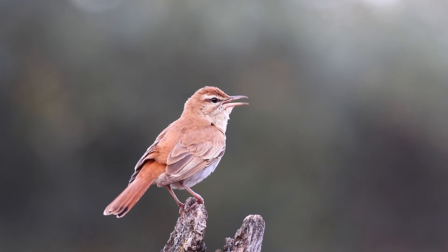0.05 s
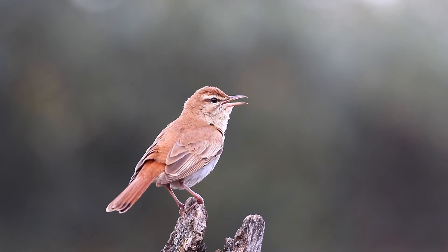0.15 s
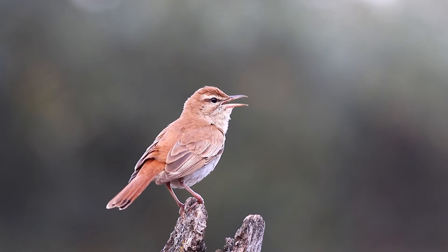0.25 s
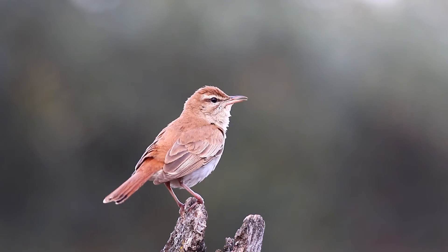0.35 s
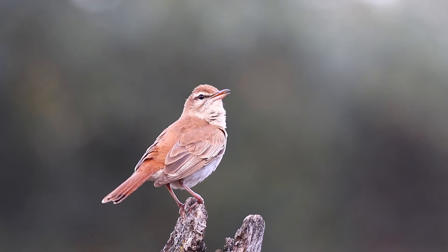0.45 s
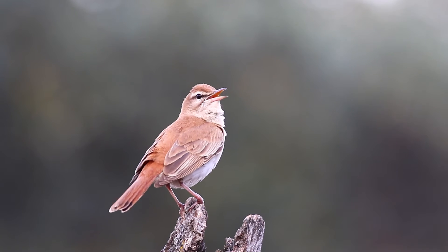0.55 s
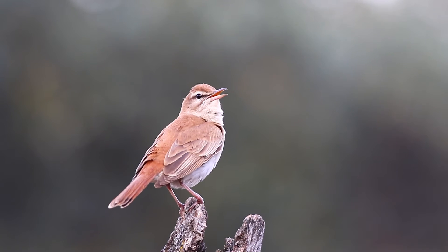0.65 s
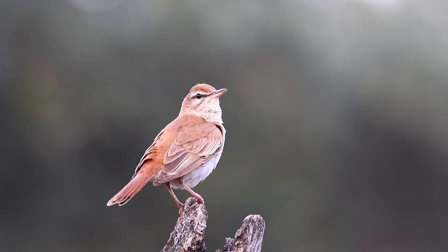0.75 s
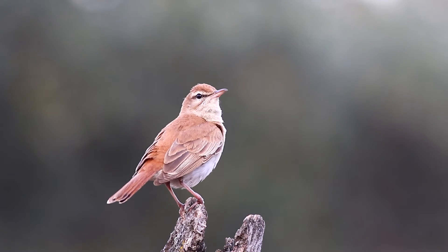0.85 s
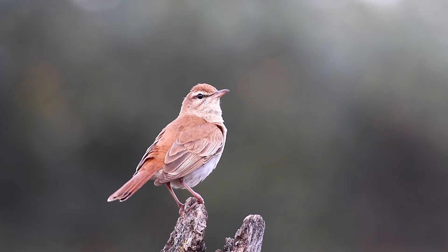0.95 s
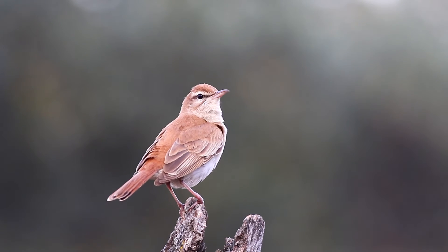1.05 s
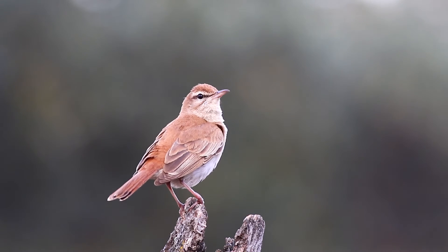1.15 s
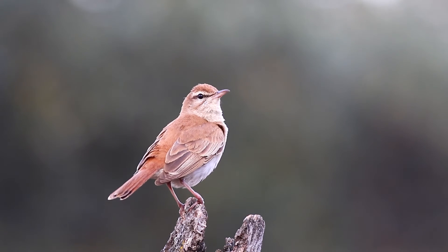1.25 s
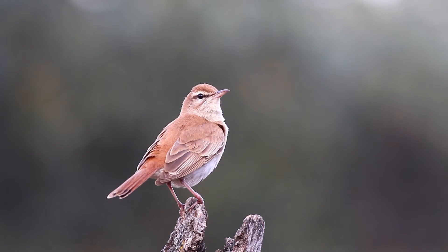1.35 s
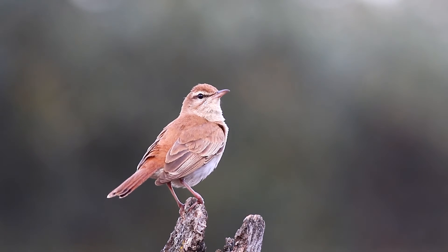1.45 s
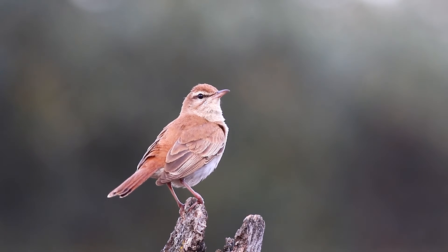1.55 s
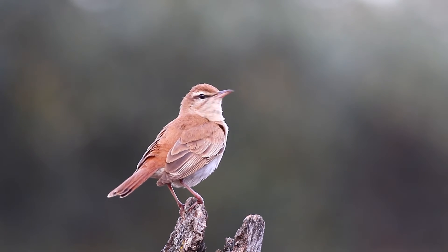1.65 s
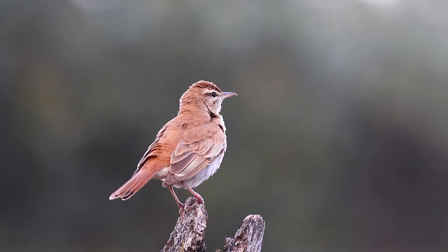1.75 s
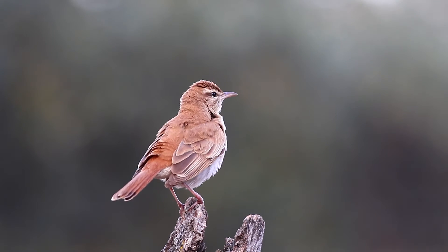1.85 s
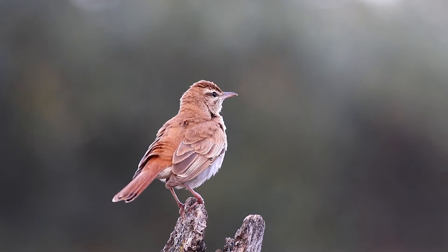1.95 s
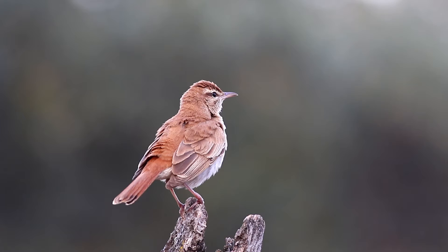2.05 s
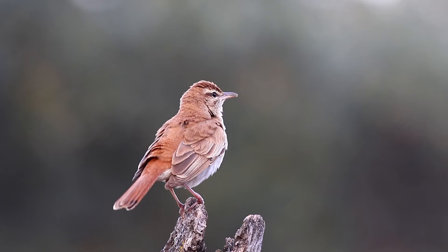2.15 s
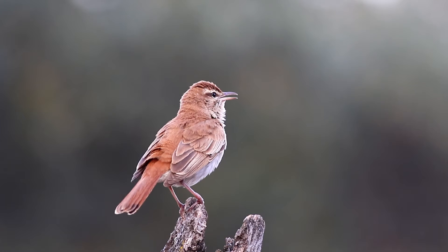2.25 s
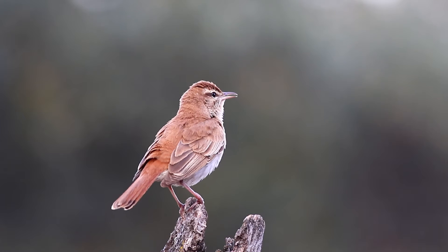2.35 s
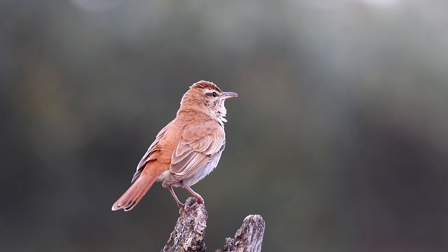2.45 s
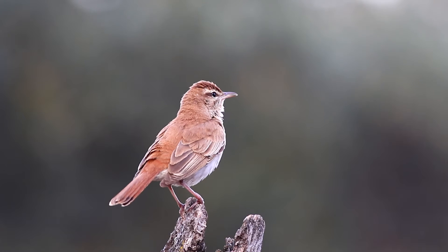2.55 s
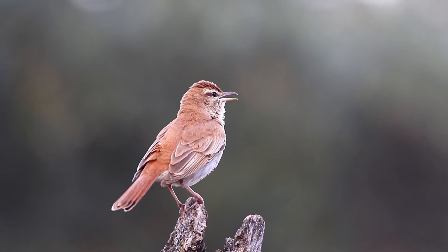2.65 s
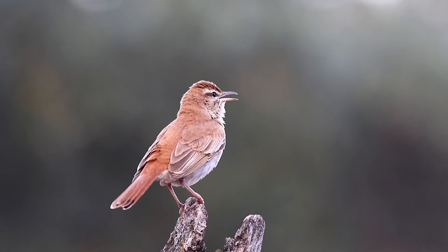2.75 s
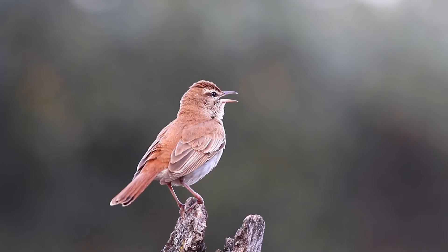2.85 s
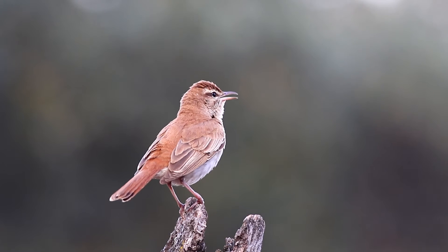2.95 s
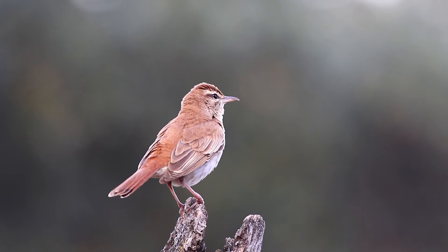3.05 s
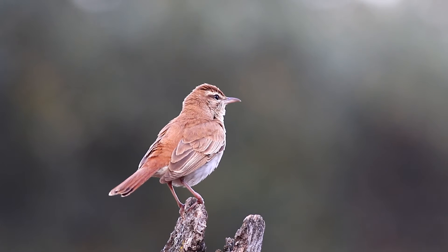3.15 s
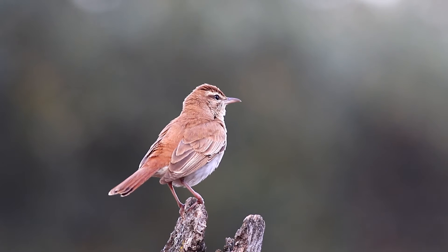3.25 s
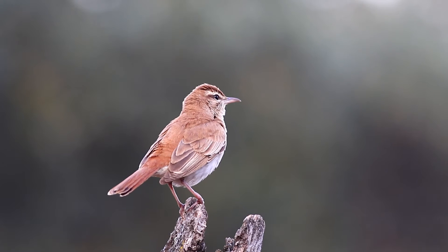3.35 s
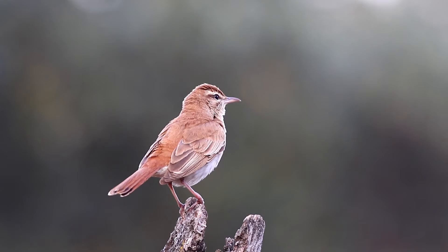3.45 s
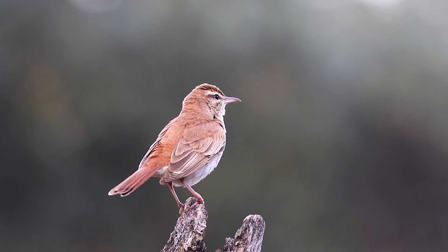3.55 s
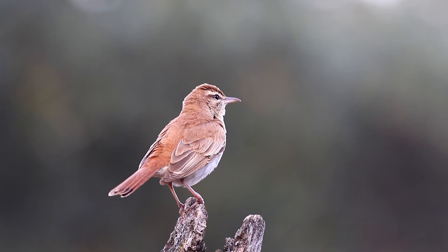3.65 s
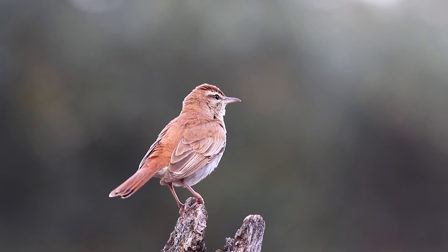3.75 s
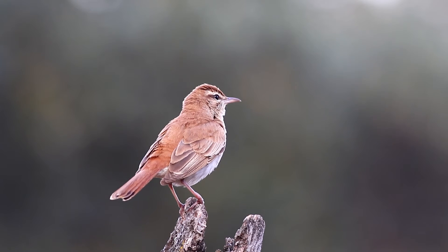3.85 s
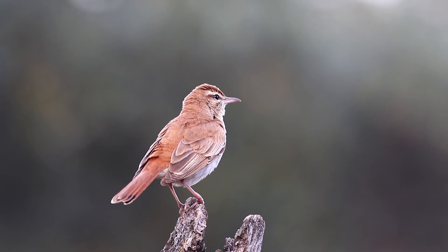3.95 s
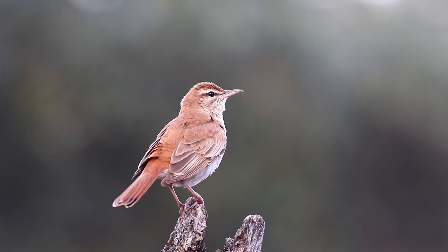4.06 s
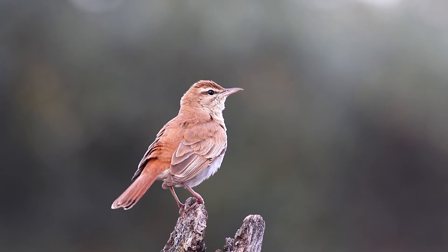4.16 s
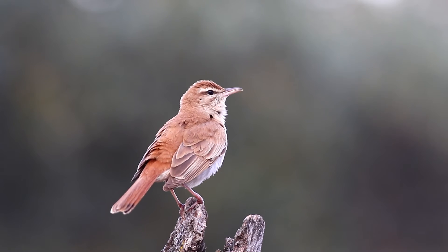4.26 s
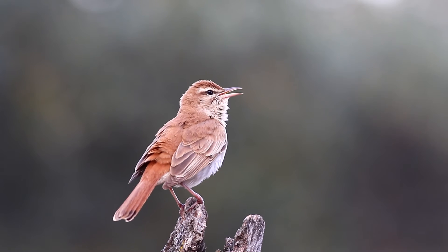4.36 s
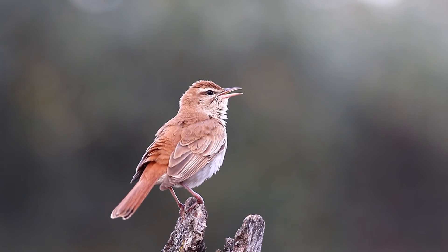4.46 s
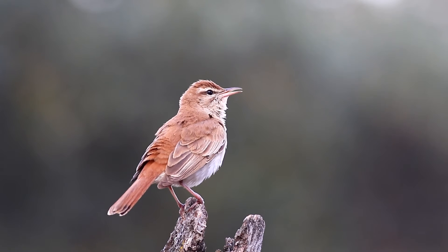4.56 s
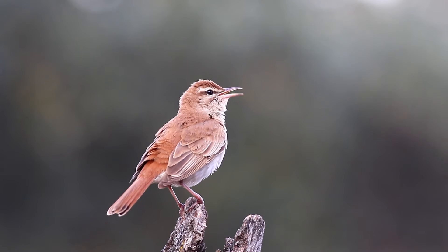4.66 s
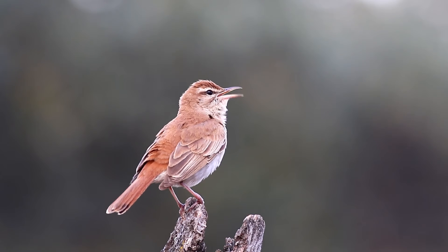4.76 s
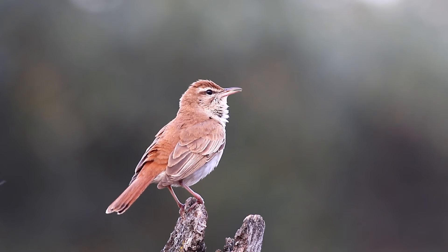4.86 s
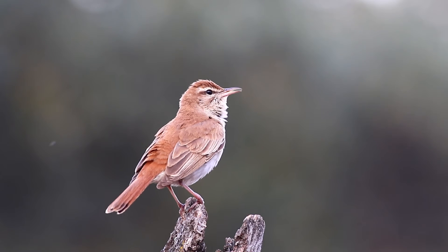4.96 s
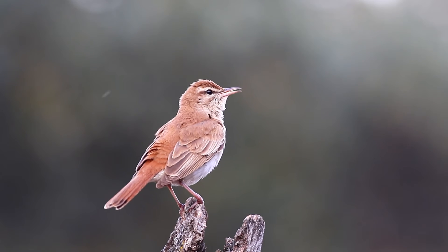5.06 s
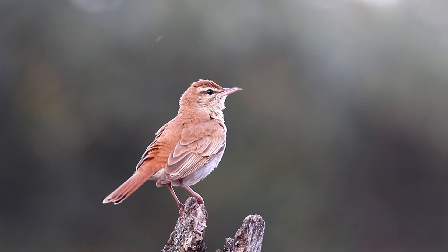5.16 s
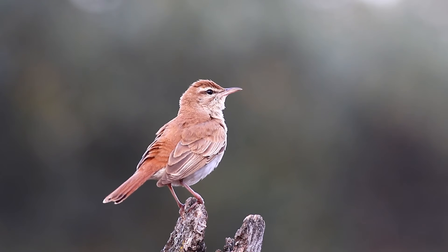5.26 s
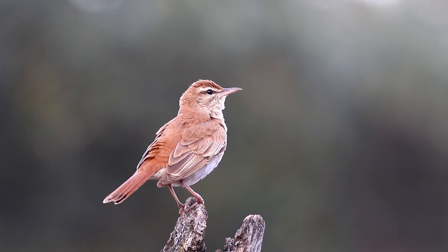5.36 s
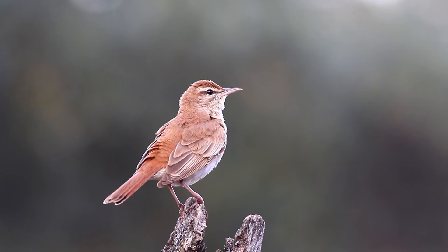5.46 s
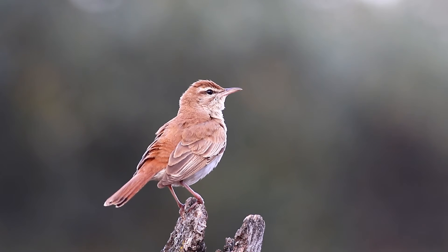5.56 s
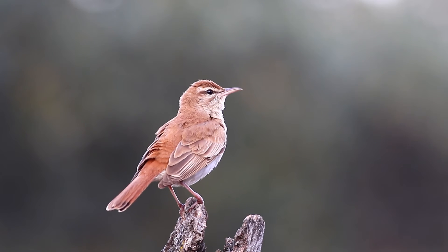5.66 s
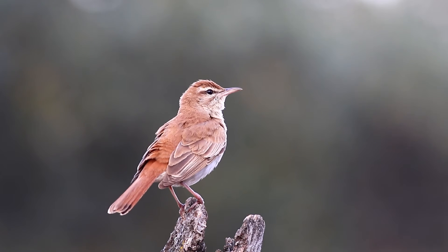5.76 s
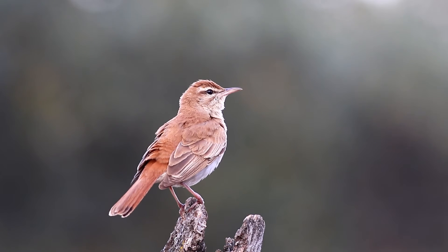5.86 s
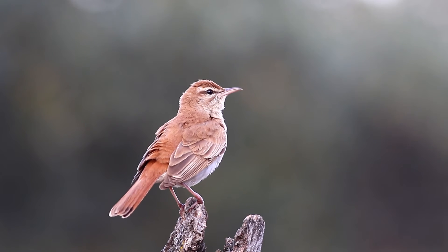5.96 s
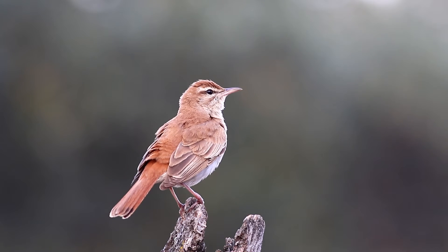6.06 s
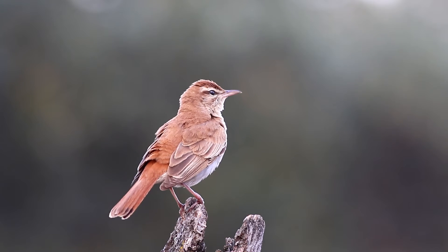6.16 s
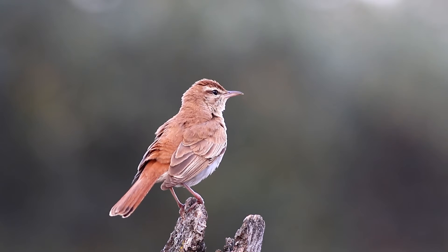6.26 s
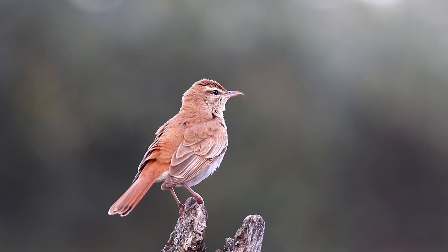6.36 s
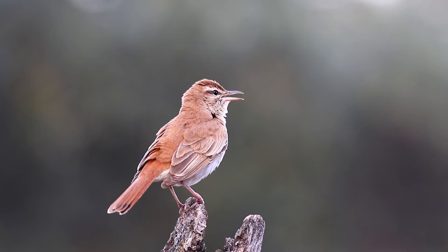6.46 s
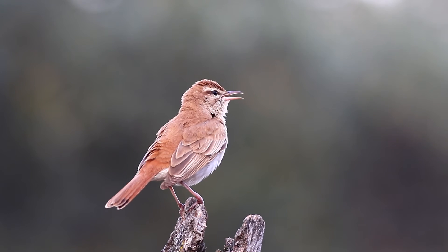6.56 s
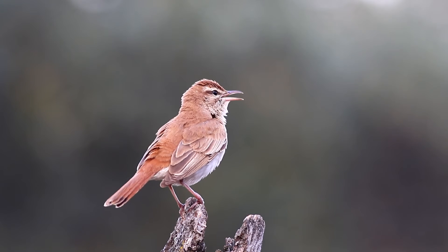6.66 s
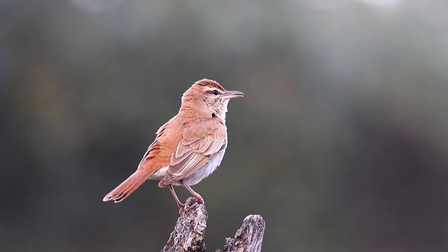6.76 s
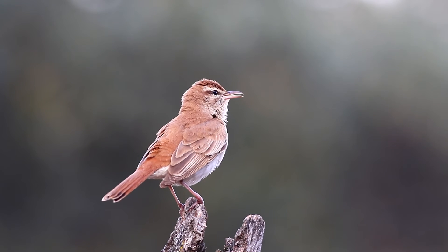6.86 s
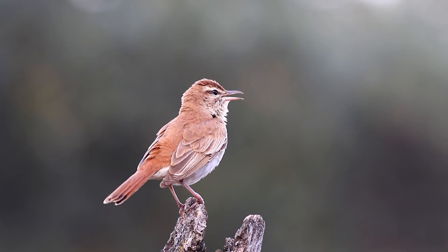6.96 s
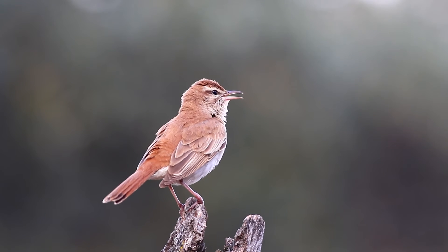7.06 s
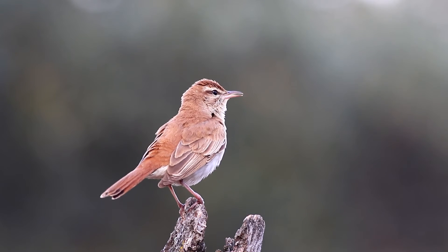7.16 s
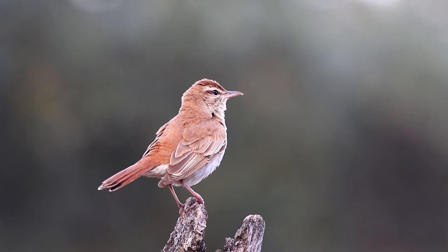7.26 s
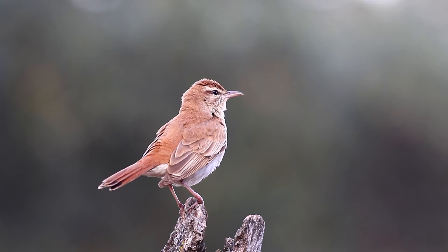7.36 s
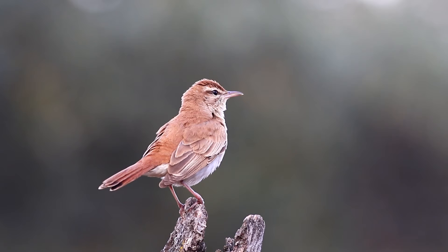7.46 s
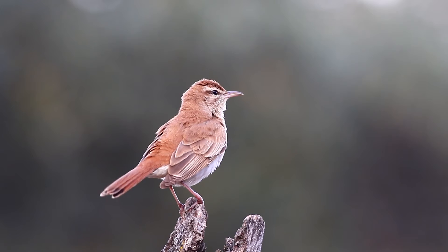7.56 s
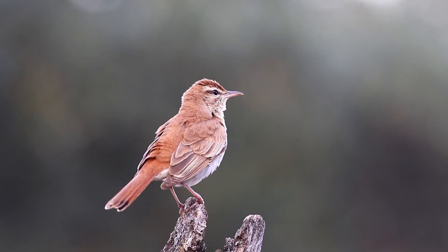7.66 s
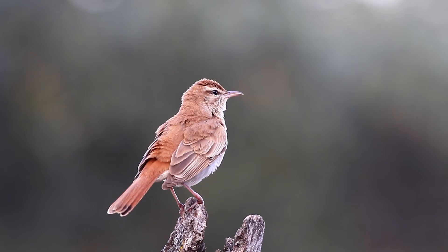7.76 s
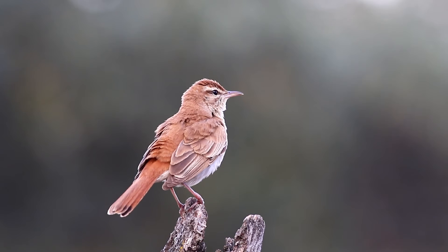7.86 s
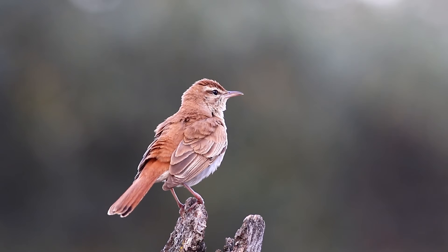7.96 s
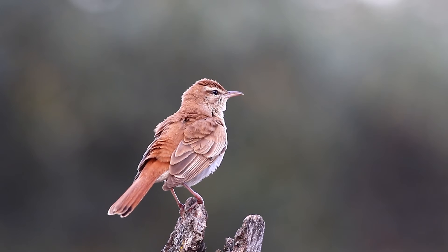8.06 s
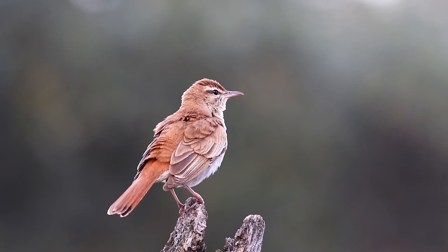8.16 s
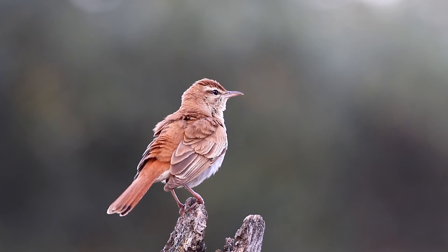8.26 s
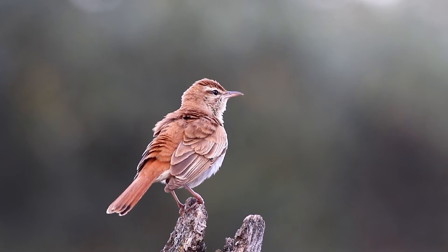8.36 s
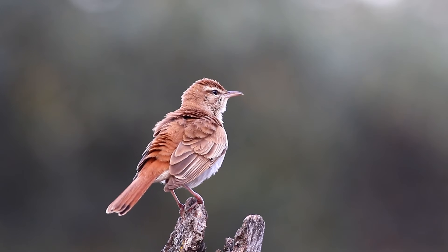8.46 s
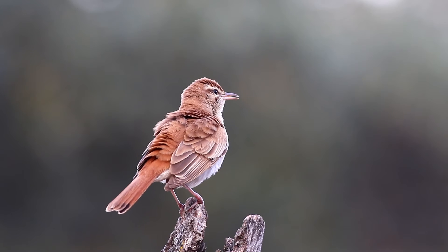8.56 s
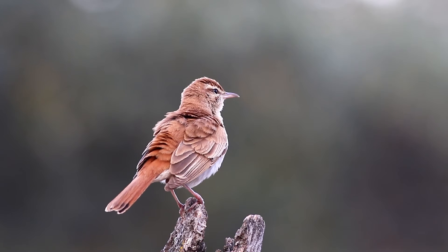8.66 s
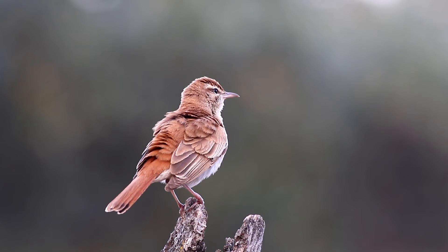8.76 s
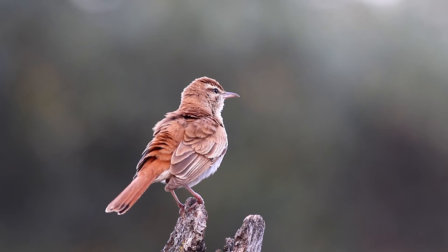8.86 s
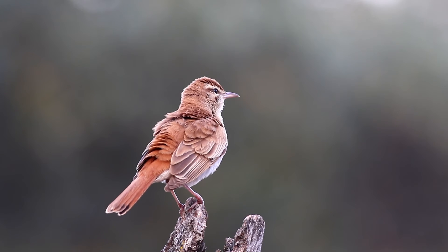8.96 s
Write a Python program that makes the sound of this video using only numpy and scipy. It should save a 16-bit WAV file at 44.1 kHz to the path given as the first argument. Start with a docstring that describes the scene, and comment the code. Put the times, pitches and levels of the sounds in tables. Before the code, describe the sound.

A small bird close by sings short phrases of slurred whistles and quick chips between pauses, with faint distant birds, insect hum and light wooden knocks.

```python
"""A scrub robin sings four short phrases: slurred whistles and quick chips from a two-voiced syrinx,
as gliding tones with overtones through beak resonances and a thin echo off bushes. Far birds call
in pure or trembling tones, an insect's wingbeat hums, blows of noise knock on ringing wood,
puffs of noise flutter, and shaped noise makes the quiet air."""
import sys
import numpy as np
from scipy import signal
from scipy.fft import rfft, irfft
from scipy.io import wavfile
from scipy.ndimage import uniform_filter1d

SR = 44100
rng = np.random.default_rng(int(sys.argv[2]) if len(sys.argv) > 2 else 0)


def transcribe(u):
    """Save the signal u as a 16-bit wav file named by the first command-line argument.

    u: samples, shape (n,) or (channels, n), limited to [-1, 1]; the rate is SR.
    q: integer samples, one column per channel.
    """
    v = np.clip(np.atleast_2d(u).T, -1, 1)
    q = np.round(v * 32767).astype(np.int16)
    wavfile.write(sys.argv[1], SR, q)


N = 397341
TIME = np.arange(N) / SR


def undb(db):
    """Decibels to gain."""
    return 10 ** (np.asarray(db) / 20)


def unit(x):
    """Scale to rms 1."""
    return x / np.sqrt(np.mean(np.abs(x) ** 2))


def level_curve(rows):
    """Gain over time from rows of (s, dB), joined by straight lines in dB and held at the ends."""
    s, db = np.transpose(rows)
    return undb(np.interp(TIME, s, db))


def add(out, start_s, x):
    """Mix a sound in at its start time."""
    i = int(start_s * SR)
    out[i:i + len(x)] += x[:max(N - i, 0)]


def walk(rate_hz, n=N):
    """Smooth random curve of rms 1, with new targets at the given rate."""
    k = max(int(SR / rate_hz), 1)
    steps = np.repeat(rng.standard_normal(n // k + 1), k)
    return unit(uniform_filter1d(steps, k)[:n])


def band(x, hz, width_hz):
    """One resonance."""
    return signal.lfilter(*signal.iirpeak(hz, hz / width_hz, fs=SR), x)


def spin(hz):
    """A complex tone that follows a pitch curve."""
    return np.exp(2j * np.pi * np.cumsum(hz) / SR)


def effort(length_s, swell):
    """Progress through a note from 0 to 1, skewed early or late, and the strength that swells and fades with it."""
    u = np.linspace(0, 1, int(length_s * SR))
    progress = u ** swell
    onset = np.minimum(u * length_s / .0015, 1)
    # abs guards against rounding below zero
    return progress, onset * np.abs(np.sin(np.pi * progress))


def note(length_s, pitches_hz, swell=1):
    """A tone that swells and fades while it glides through evenly spaced pitches."""
    u = np.linspace(0, 1, int(length_s * SR))
    count = len(pitches_hz)
    glide = np.polyfit(np.linspace(0, 1, count), pitches_hz, count - 1)
    _, strength = effort(length_s, swell)
    return strength * spin(np.polyval(glide, u))


def rasp(length_s, pitches_hz, spread_hz):
    """A note whose pitch trembles too fast to follow."""
    tone = note(length_s, pitches_hz)
    return tone * spin(spread_hz * walk(1500, len(tone)))


def scatter(x, t60_s, onset_s):
    """Echo from many twigs and leaves: a dense tail that builds up and dies away."""
    t = np.arange(SR) / SR
    tail = rng.standard_normal(SR) * undb(-60 * t / t60_s) * (1 - np.exp(-t / onset_s))
    return signal.fftconvolve(x, tail / np.linalg.norm(tail))[:N]


def air(level_db=-54.5, sway_db=0.5):
    """Still air: a smooth hiss whose low rumble sways in level."""
    # Each row: frequency in Hz, relative level per Hz in dB.
    spectrum = [(15, -67.5), (25, -32.5), (76, -5), (222, -6.5), (307, -3.5), (473, -7), (620, -8),
                (905, -9), (2590, -12.5), (4210, -15.5), (9720, -18), (15800, -22.5)]
    hz, db = np.transpose(spectrum)
    bins_hz = np.maximum(np.fft.rfftfreq(N, 1 / SR), 1)
    shape = undb(np.interp(np.log(bins_hz), np.log(hz), db))
    noise = unit(irfft(rfft(rng.standard_normal(N)) * shape, N))
    rumble = band(noise, hz=200, width_hz=690)
    return undb(level_db) * (noise + rumble * (undb(sway_db * walk(1.4)) - 1))


def insect(first_hz=226, last_hz=240, wobble=0.071, second_db=-1, third_db=-10):
    """A passing insect: an unsteady wingbeat with two overtones."""
    # Each row: time in seconds, wingbeat level in dB before its random unsteadiness.
    passing = [(.1, -56.5), (1.3, -65), (1.9, -72), (3.7, -73.5), (3.95, -56), (4.2, -72.5), (8.2, -79),
               (8.35, -56.5)]
    wing = spin(np.linspace(first_hz, last_hz, N) * (1 + wobble * walk(45)))
    hum = (wing + undb(second_db) * wing ** 2 + undb(third_db) * wing ** 3).real
    return hum * level_curve(passing) * undb(2 * walk(8.8))


def opening_whistles(fade_s=0.0034, bend_s=0.0015):
    """The wavy whistle opening the first and last phrase; the muscles round off its contour's corners."""
    # Each row: time from the whistle's start in seconds, pitch in Hz, level in dB.
    contour = [(0, 3580, -35), (.018, 3775, -17.5), (.033, 3790, -13.5), (.048, 3540, -20),
               (.066, 3290, -28.5), (.08, 3250, -26.5), (.101, 3525, -14.5), (.119, 3500, -34)]
    # Each row: start in seconds, gain in dB.
    repeats = [(.136, 0), (6.528, -1.5)]
    s, hz, db = np.transpose(contour)
    t = np.arange(s[0] - fade_s, s[-1] + fade_s, 1 / SR)
    strength = np.interp(t, np.r_[t[0], s, t[-1]], np.r_[0, undb(db), 0])
    strength = uniform_filter1d(strength, int(bend_s * SR))
    pitch_hz = uniform_filter1d(np.interp(t, s, hz), int(bend_s * SR))
    whistle = strength * spin(pitch_hz)
    out = np.zeros(N, complex)
    for start_s, gain_db in repeats:
        add(out, start_s + t[0], undb(gain_db) * whistle)
    return out


def arch(length_s, top_hz, bend_hz, swell, roundness=1.3):
    """A note whose pitch rises and sinks with its strength."""
    _, strength = effort(length_s, swell)
    return strength * spin(top_hz - bend_hz * (1 - strength ** roundness))


def scoop(length_s, start_hz, held_hz, end_hz, attack_s, release_s, rise_s=.0078, waver=.008):
    """A whistle that slides up exponentially and settles, never quite steady: attack, hold, release."""
    t = np.arange(0, length_s, 1 / SR)
    strength = np.clip(np.minimum(t / attack_s, (length_s - t) / release_s), 0, 1)
    hz = np.linspace(held_hz, end_hz, len(t)) + (start_hz - held_hz) * np.exp(-t / rise_s)
    return strength * spin(hz * (1 + waver * walk(90, len(t))))


def drop(length_s, start_hz, end_hz, swell):
    """A chip that is loudest halfway down its fall."""
    progress, strength = effort(length_s, swell)
    return strength * spin(start_hz + (end_hz - start_hz) * progress)


def stutters(chip_s=.0125, gap_s=.0145, pause_s=.001, second_s=0.016, second_db=-6, last_ratio=.96):
    """Three quick upward flicks; the other side of the syrinx joins above the first."""
    # Each row: start of the middle chip in seconds, length of the first in seconds, reference pitch in Hz,
    # then the levels of the first, middle and last chip in dB.
    triplets = [(.58, .022, 3135, -14.5, -13, -36), (.647, .022, 3395, -11, -5.5, -16.5),
                (.724, .019, 3413, -13, -11.5, -23.5), (6.996, 0.024, 3090, -18, -19, -38),
                (7.061, .024, 3320, -16.5, -13.5, -30.5), (7.148, 0.02, 3375, -20.5, -15.5, -23)]
    out = np.zeros(N, complex)
    for s, first_s, hz, first_db, middle_db, last_db in triplets:
        flick_hz = hz * np.array([.76, .99, 1.03])
        first = note(first_s, hz * np.array([.68, .94, .93]), swell=1.6)
        second_voice = note(second_s, hz * np.array([.98, 1.06, 1.1]), swell=1.3)
        # both voices end together
        add(out, s - pause_s - first_s, undb(first_db) * first)
        add(out, s - pause_s - second_s, undb(first_db + second_db) * second_voice)
        add(out, s, undb(middle_db) * note(chip_s, flick_hz, swell=1.53))
        add(out, s + gap_s, undb(last_db) * note(chip_s, last_ratio * flick_hz, swell=0.9))
    return out


def tumble(start_s=2.514, first_s=.0215, shrink=.85, top_hz=2590, sink_hz=90, foot_hz=1640, db=-20.0,
           fade_db=2.7, octave_db=-52, reflection_lag_s=0.004, reflection_db=-10, count=4):
    """Joined low swings, each shorter, lower and softer, over a thin octave; a close reflection trails and beats."""
    hz, strength = [], []
    for k in range(count):
        progress, _ = effort(first_s * shrink ** k, swell=0.93)
        swing = np.sin(np.pi * progress) ** 2
        hz.append(foot_hz + (top_hz - k * sink_hz - foot_hz) * swing)
        strength.append(undb(db - k * fade_db) * swing)
    tone = spin(np.concatenate(hz))
    swings = np.concatenate(strength) * tone
    octave = signal.windows.tukey(len(tone), .1) * tone ** 2
    out = np.zeros(N, complex)
    add(out, start_s, swings + undb(octave_db) * octave)
    add(out, start_s + reflection_lag_s, undb(reflection_db) * swings)
    return out


def ticks(foot_hz=2520, upper_hz=(4450, 4330, 3650), upper_s=.013, upper_lag_s=0.00097, upper_db=-24,
          upper_fade=0.34):
    """One side of the syrinx falls to a low foot, fading tick by tick; the other adds a high chip that fades less."""
    # Ticks ending the second phrase. Each row: start in seconds, length in seconds, start pitch in Hz,
    # level of the falling voice in dB.
    falls = [(2.808, .022, 3815, -18.5), (2.886, .02, 3340, -20.5), (2.913, 0.018, 3090, -25),
             (2.945, 0.02, 2930, -30.5), (2.975, 0.018, 2870, -32), (3.019, 0.014, 2850, -34.5)]
    out = np.zeros(N, complex)
    for s, length_s, start_hz, db in falls:
        add(out, s, undb(db) * drop(length_s, start_hz, foot_hz, swell=0.45))
        add(out, s + upper_lag_s, undb(upper_db + upper_fade * db) * note(upper_s, upper_hz))
    return out


def warble(length_s=0.188, rate_hz=57.3, first_hz=2150, last_hz=2040, swing_hz=100, db=-30, throb=0.4,
           second_hz=230, second_db=-10):
    """A low buzzy trill, loudest at the top of each swing; the second voice beats just above it."""
    t = np.arange(0, length_s, 1 / SR)
    swing = -np.cos(2 * np.pi * rate_hz * t)
    tone = spin(np.linspace(first_hz, last_hz, len(t)) + swing_hz * swing)
    pair = tone * (1 + undb(second_db) * spin(second_hz * (1 + .5 * walk(100, len(t)))))
    return undb(db) * signal.windows.tukey(len(t), .08) * (1 + throb * swing) * pair


def syllables():
    """All the robin's notes as one complex tone."""
    # Notes bending with strength. Each row: start in seconds, length in seconds, top pitch in Hz,
    # bend in Hz, level in dB, swell (under 1 peaks early, over 1 late).
    arches = [(.304, .016, 5200, 120, -39, 1.1), (6.704, .012, 5200, 120, -44, 1.1),
              (.509, 0.028, 2780, 248, -22, 1.03), (2.31, .088, 2747, 86, -17.5, 1.04),
              (2.733, 0.049, 3190, 560, -15.5, 1.58), (2.818, .039, 3206, 604, -14, 1.25),
              (4.37, 0.028, 2460, 40, -34.5, 1.1), (4.399, 0.027, 2625, 260, -20, 1.02),
              (4.427, .029, 2850, 527, -15, 1.4), (4.83, 0.013, 5340, 1300, -24, 0.94),
              (5.117, .017, 5550, 99.3, -44, .9), (6.918, 0.032, 2793, 297, -24, 1.5)]
    # Whistles up to a held, drifting pitch. Each row: start in seconds, length in seconds, start, held and
    # end pitch in Hz, level in dB, attack in seconds, release in seconds.
    scoops = [(0.31, 0.022, 3800, 4360, 4550, -17, 0.021, .005),
              (4.463, 0.039, 2350, 3170, 3186, -15.5, .007, .025),
              (4.501, 0.035, 2390, 3185, 3270, -15.5, 0.0094, .021),
              (4.575, 0.04, 2660, 3366, 3550, -10.5, .023, .017),
              (4.756, .078, 2500, 4047, 3940, -12.5, 0.02, 0.0036),
              (5.066, 0.057, 1940, 4450, 4340, -31, 0.0027, .004),
              (6.708, 0.02, 3600, 4150, 4240, -20.5, 0.016, 0.0045)]
    # Falling chips. Each row: start in seconds, length in seconds, start and end pitch in Hz,
    # level in dB, swell (under 1 peaks early, over 1 late).
    drops = [(.342, 0.019, 4850, 2940, -16, 0.51), (.367, 0.015, 3900, 3180, -17.5, 1.14),
             (0.395, 0.026, 3520, 2660, -17, .4), (2.264, .036, 3110, 2730, -24.5, 1.85),
             (2.293, 0.036, 3460, 3120, -20, 0.75), (2.482, 0.031, 3400, 1770, -26, 1.8),
             (4.455, 0.011, 2750, 2310, -33, 0.94), (4.491, .015, 3050, 2454, -29.5, 1.0),
             (6.737, 0.0266, 4640, 3134, -20, 0.55), (6.772, 0.016, 3850, 2990, -20.5, 0.65),
             (6.802, 0.023, 3350, 3030, -20.5, .45)]
    voice = opening_whistles() + stutters() + tumble() + ticks()
    for s, length_s, top_hz, bend_hz, db, swell in arches:
        add(voice, s, undb(db) * arch(length_s, top_hz, bend_hz, swell))
    for s, length_s, start_hz, held_hz, end_hz, db, attack_s, release_s in scoops:
        add(voice, s, undb(db) * scoop(length_s, start_hz, held_hz, end_hz, attack_s, release_s))
    for s, length_s, start_hz, end_hz, db, swell in drops:
        add(voice, s, undb(db) * drop(length_s, start_hz, end_hz, swell))
    add(voice, 4.881, warble())
    return voice


def robin(third_db=0, fourth_db=-8, tremble_rad=0.098, beak_hz=5900, upper_beak_hz=11900):
    """Two whistling voices share one airway, so they beat and make common overtones."""
    # How hard the syrinx membranes close. Each row: time in seconds, overtone level in dB before the beak.
    closure = [(.17, -32.5), (.62, -31), (2.35, -30), (2.55, -40), (2.76, -35.5), (2.9, -20.5), (4.45, -33),
               (4.6, -36), (4.8, -33), (4.95, -36), (6.55, -35), (7.05, -33)]
    # Harsh passages. Each row: start in seconds, end in seconds, turbulence gain in dB.
    harsh_spans = [(0.555, 0.74, -40), (2.808, 3.03, -39), (4.394, 4.526, -43.5), (6.971, 7.174, -42)]
    voice = syllables()
    harsh = sum(undb(db) * ((TIME > start_s) & (TIME < end_s)) for start_s, end_s, db in harsh_spans)
    strength = np.abs(voice)
    # in harsh passages the membranes tremble, which smears the overtones most, and the air turns turbulent
    phase = np.angle(voice) + tremble_rad * (harsh > 0) * walk(900)
    turbulence = band(rng.standard_normal(N), hz=5806, width_hz=6000)
    turbulence = unit(band(turbulence, hz=5000, width_hz=5600))
    overtones = np.cos(2 * phase) + undb(third_db) * np.cos(3 * phase) + undb(fourth_db) * np.cos(4 * phase)
    overtones = strength * level_curve(closure) * overtones
    # windpipe and open beak pass the overtones through two broad resonances
    beak = band(overtones, beak_hz, width_hz=1800) - band(overtones, upper_beak_hz, width_hz=1300)
    return strength * np.cos(phase) + np.sqrt(strength) * harsh * turbulence + beak


def far_whistler(opening_s=1.115, opening_hz=4400, opening_db=-53, fall=0.032):
    """A far bird: one long arched note, then a sinking run of pure notes, each falling a little."""
    # Each row: start in seconds, length in seconds, level in dB.
    run = [(1.27, .055, -54), (1.354, 0.058, -48.5), (1.447, .058, -48.5), (1.532, .065, -44),
           (1.627, .06, -46.5), (1.727, .06, -49), (1.822, 0.046, -48.5), (1.919, .065, -48.5),
           (2.022, .055, -52.5), (2.124, 0.1, -49)]
    # The line the run sinks along. Each row: time in seconds, pitch in Hz.
    run_pitch = [(1.27, 3905), (1.54, 3090), (1.73, 2950), (1.93, 2920), (2.13, 2580)]
    out = np.zeros(N)
    opening = arch(length_s=0.12, top_hz=opening_hz, bend_hz=180, swell=0.96).real
    add(out, opening_s, undb(opening_db) * opening)
    for s, length_s, db in run:
        hz = np.interp(s, *np.transpose(run_pitch))
        add(out, s, undb(db) * note(length_s, (hz * (1 + fall), hz * (1 - fall))).real)
    return out


def far_callers(lisp_s=.085, lisp_spread=0.28, octave_db=-4, foot_hz=2950, crest_hz=3650,
                rattle_db=-54.5, upper_ratio=1.16, upper_db=-5):
    """Hoarse high lisps, a few chirps, and a rattle of two-voiced arched chirps that slows down."""
    # Thin calls from the bushes. Each row: start in seconds, start and end pitch in Hz, level in dB.
    lisps = [(1.155, 7580, 6150, -53), (1.28, 7600, 5890, -48.5), (1.438, 7430, 6020, -47.5),
             (3.6, 7000, 5300, -50.5), (5.863, 6300, 4500, -55.5), (7.946, 7220, 5780, -51.5),
             (8.599, 8080, 7400, -45), (8.719, 8080, 7470, -41.5), (8.853, 8070, 7320, -45)]
    # Another far bird. Each row: start in seconds, length in seconds, start and end pitch in Hz, level in dB.
    chirps = [(7.375, 0.067, 3620, 3450, -51), (7.755, .035, 5200, 4200, -56.5),
              (7.823, .05, 2510, 3700, -59), (7.86, .035, 4200, 5400, -55)]
    out = np.zeros(N)
    lowpass = signal.butter(4, 13000, fs=SR, output="sos")
    for s, start_hz, end_hz, db in lisps:
        # the steeper the fall, the hoarser the call
        tone = rasp(lisp_s, (start_hz, end_hz), lisp_spread * (start_hz - end_hz))
        octave = signal.sosfilt(lowpass, (tone ** 2).real)
        add(out, s, undb(db) * (tone.real + undb(octave_db) * octave))
    for s, length_s, start_hz, end_hz, db in chirps:
        add(out, s, undb(db) * rasp(length_s, (start_hz, end_hz), spread_hz=140).real)
    beats_s = 8.225 + np.cumsum(.046 + .0014 * 1.47 ** np.arange(12))
    hump_hz = np.array([foot_hz, crest_hz, foot_hz])
    for s, gap_s in zip(beats_s, np.diff(beats_s)):
        low = rasp(0.66 * gap_s, hump_hz, spread_hz=200).real
        high = rasp(0.66 * gap_s, hump_hz * upper_ratio, spread_hz=200).real
        add(out, s, undb(rattle_db) * (low + undb(upper_db) * high))
    return out


def flutter(rate_hz=18.0, depth_db=6, rustle_db=-5):
    """Low puffs of noise in quick succession, each with a light rustle."""
    # Each row: time in seconds, puff level in dB.
    swells = [(2.1, -75), (2.55, -57), (3.2, -62.5), (3.53, -49.5), (3.75, -68)]
    beat = spin(rate_hz * (1 + .05 * walk(6))).real
    puffs = unit(band(rng.standard_normal(N), hz=200, width_hz=230))
    rustle = unit(band(rng.standard_normal(N), hz=8000, width_hz=5000))
    return (puffs + undb(rustle_db) * rustle) * unit(undb(depth_db * beat)) * level_curve(swells)


def knocks(contact_s=0.0083):
    """Short scraping blows ring a piece of wood."""
    # Each row: start in seconds, peak level in dB, centre of the blow's spectrum in Hz.
    blows = [(5.567, -33.5, 1090), (5.603, -32.5, 1070), (5.79, -41.5, 500), (5.832, -28.5, 670),
             (5.842, -31.5, 660), (5.906, -37, 550)]
    # Resonances of the wood. Each row: frequency in Hz, width in Hz, relative gain in dB.
    modes = [(477, 140, 6.5), (680, 170, 0.5), (990, 58, 3.5), (1680, 160, 3.5)]
    out, t = np.zeros(N), np.arange(SR // 10) / SR
    soft = signal.butter(4, 2200, fs=SR, output="sos")
    for s, db, centre_hz in blows:
        blow = signal.sosfilt(soft, rng.standard_normal(len(t)) * np.exp(-t / contact_s))
        ring = sum(undb(mode_db) * band(blow, hz, width_hz) for hz, width_hz, mode_db in modes)
        ring = band(ring, centre_hz, width_hz=570)
        add(out, s, undb(db) * ring / np.abs(ring).max())
    return out


def scene(bush_lag_s=0.089):
    """The close robin with near and far echoes, over the life of the scrub."""
    song = robin()
    near_echo = undb(-18.5) * scatter(song, t60_s=.2, onset_s=0.0021)
    far_echo = undb(-26) * scatter(song, t60_s=0.98, onset_s=.04)
    out = song + near_echo + far_echo
    # one dense bush throws back a distinct echo
    add(out, bush_lag_s, undb(-31) * scatter(song, t60_s=0.047, onset_s=.002))
    whistler, callers = far_whistler(), far_callers()
    whistler_echo = undb(-13) * scatter(whistler, t60_s=.4, onset_s=.004)
    callers_echo = undb(-5) * scatter(callers, t60_s=0.49, onset_s=0.004)
    others = whistler + whistler_echo + callers + callers_echo
    return (out + others + knocks() + insect() + flutter() + air())[None]


def record(dry, top_hz=15500):
    """The recorder cuts the top with a steep low-pass."""
    return signal.sosfilt(signal.ellip(12, .1, 80, top_hz, fs=SR, output="sos"), dry)


dry = scene()
out = record(dry)
transcribe(out)
```